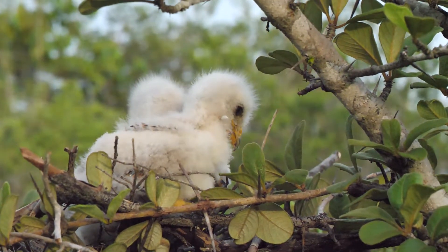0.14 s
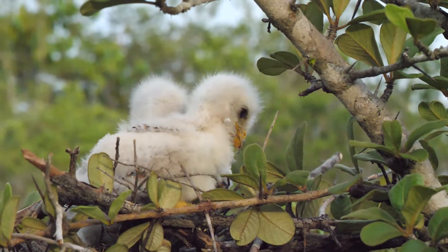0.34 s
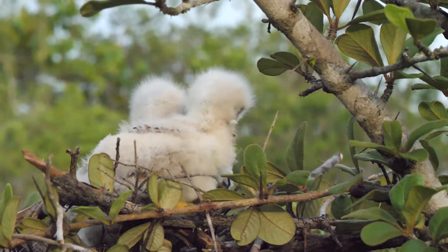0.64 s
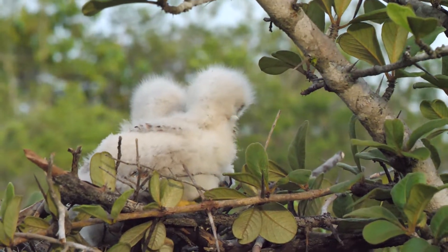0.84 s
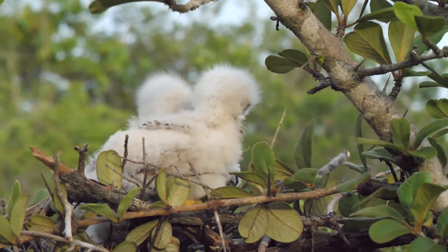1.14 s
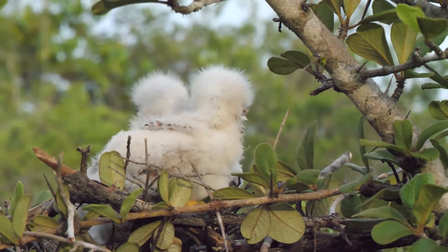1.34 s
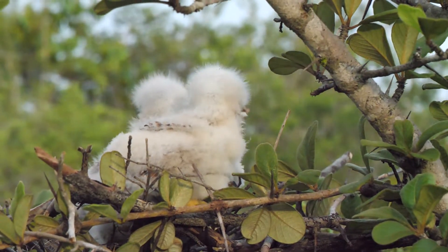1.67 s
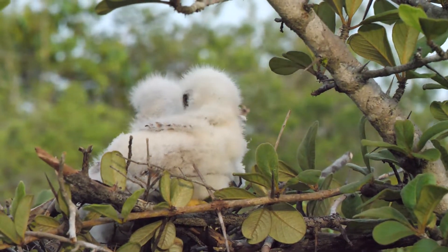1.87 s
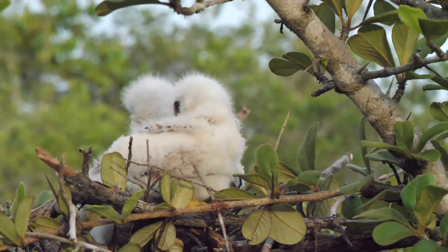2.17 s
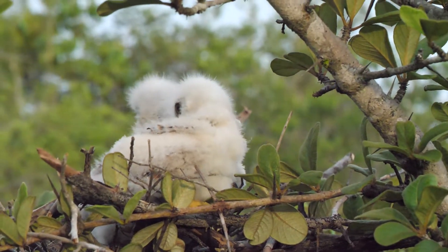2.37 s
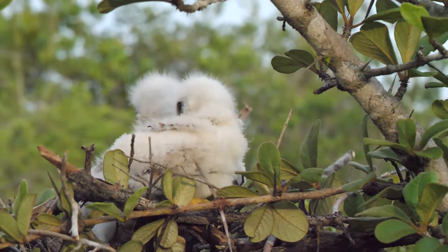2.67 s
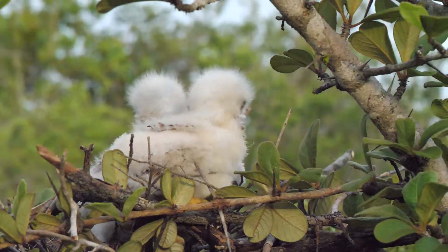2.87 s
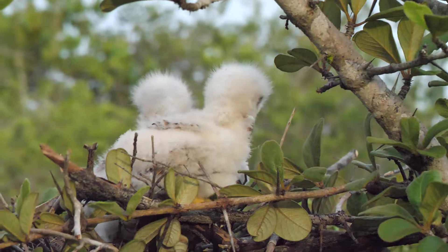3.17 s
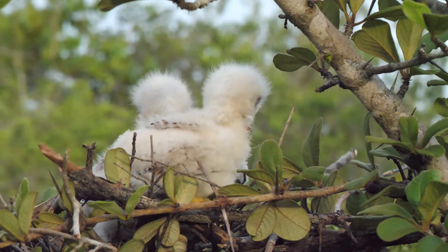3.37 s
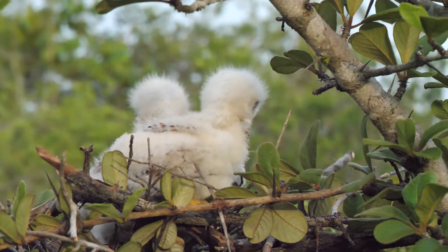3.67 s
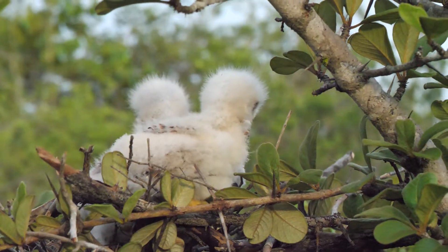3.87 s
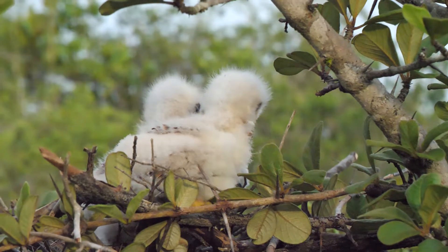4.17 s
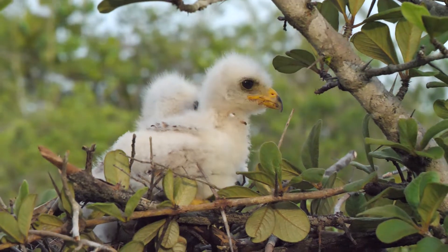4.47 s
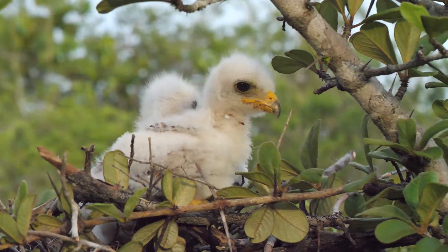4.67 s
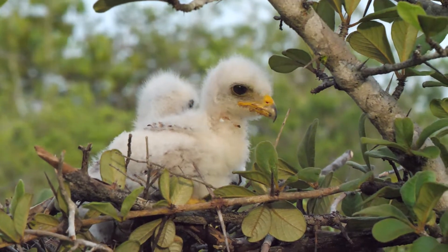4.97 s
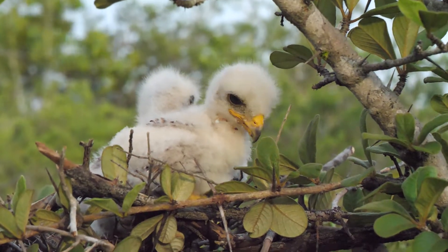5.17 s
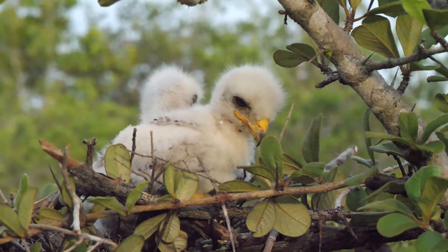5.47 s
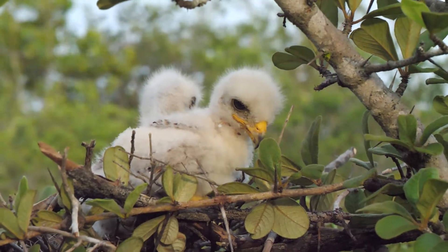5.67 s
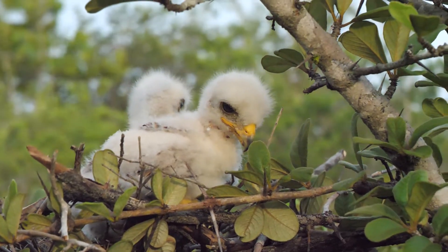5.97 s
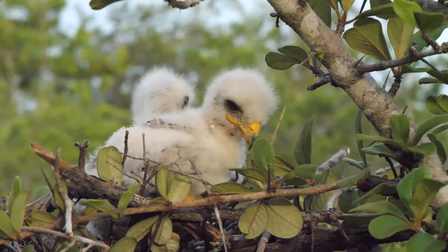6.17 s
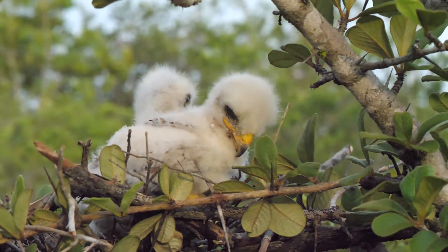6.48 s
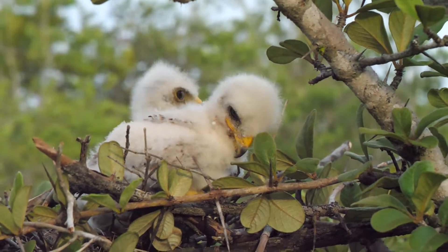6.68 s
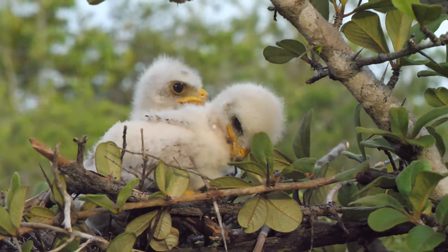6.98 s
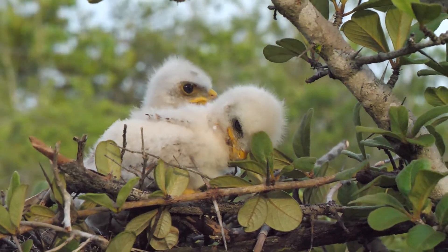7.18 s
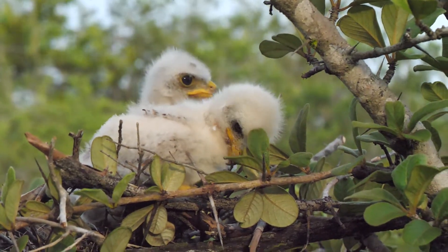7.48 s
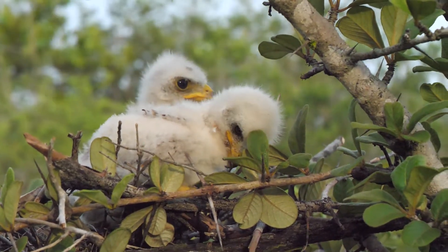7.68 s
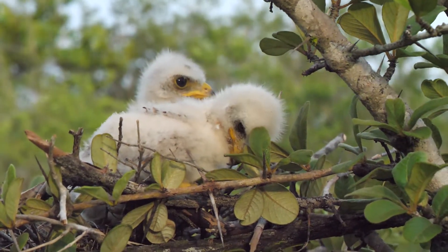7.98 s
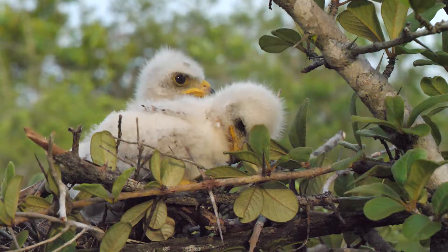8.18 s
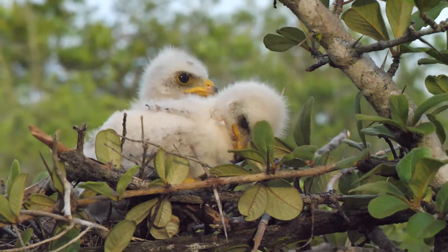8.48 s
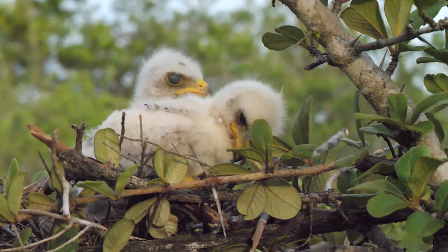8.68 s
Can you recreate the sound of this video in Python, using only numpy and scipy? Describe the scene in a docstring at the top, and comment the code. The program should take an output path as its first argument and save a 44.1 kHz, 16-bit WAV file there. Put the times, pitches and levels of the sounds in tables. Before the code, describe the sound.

Raptor chicks call close to a stereo microphone in a leafy tree nest. From 0 to 0.9 seconds a dense, shrill twitter runs at about twenty peeps a second, each whistle swooping down and up, deeper ones rasping, ending in a low squawk. A shorter run follows at 1.2-1.5, then faint squeaks and a few weak peeps near 2.2. Another burst comes at 2.6-2.9. From 3.4 to 4.5 the longest, loudest run swells and ends in a rough squawk; a further burst fills 4.7-5.05. Small squeaks follow, with soft dull bumps at 5.5-6.0 as low wind rises. A quieter, hoarser run at 6.1-6.6 ends in squawks, with three peeps near 7. Afterwards only sparse squeaks, weak peeps at 8.4 and a bump near 8.5 remain. Faint far whistles around 2.6-3.4, occasional buzzy distant chirps, a barely audible hum near 1.5-2.1 and airy hiss lie behind.

```python
"""Rapid, whistled twitters burst out close by: raptor nestlings calling in a stick nest in a tree.
Each peep is a whistle that swoops down and up again, some twenty a second; deep swoops break into a rasp.
Dives fall almost without rising, and bursts often end in a squawk about two octaves lower.
Shaped noise makes the rasp, the echoes from sticks and leaves, a few soft bumps, low wind and airy hiss.
Far birds add arched whistles, buzzy chirps and one faint hum."""
import sys
import numpy as np
from scipy import signal
from scipy.fft import rfft
from scipy.io import wavfile

SR = 44100
rng = np.random.default_rng(int(sys.argv[2]) if len(sys.argv) > 2 else 0)


def dump(signal):
    """Clip the signal to [-1, 1] and save it as 16-bit WAV at the path in sys.argv[1]."""
    limited = np.clip(np.atleast_2d(signal).T, -1, 1)
    pcm = np.round(limited * 32767).astype(np.int16)
    wavfile.write(sys.argv[1], SR, pcm)


N = 388962  # length of the scene in samples
TOP_HZ = 15750  # nothing is voiced or recorded above this

# The whistled peeps, burst by burst.
# Each row: start in seconds, nominal length in ms, pitch at the dip in Hz, level in dB before shared trims.
PEEPS = [(0, 12.7, 4730, -24), (.046, 13, 4930, -26), (0.085, 18.4, 4850, -26), (.128, 27, 4190, -26),
         (.175, 17, 5030, -25.5), (.216, 23.5, 4790, -25.5), (.268, 21.5, 4730, -27),
         (0.318, 9.5, 5220, -25.5), (.359, 19, 4900, -25), (.402, 20.5, 4880, -26), (.446, 21.3, 4790, -26),
         (.49, 25.7, 4230, -27.5), (.54, 16.4, 5410, -26.5), (.569, 32, 4570, -24.5),
         (.624, 21.6, 5420, -24.5), (.655, 36, 4540, -23), (.711, 25, 4590, -24), (.75, 31, 4460, -27.5),
         (.798, 24.3, 4980, -29.5), (.845, 21, 5490, -31.5), (0.888, 30, 3730, -30),
         (1.182, 14.4, 4310, -33), (1.201, 21.4, 5340, -26.5), (1.256, 12, 5570, -37.5),
         (1.29, 25, 4400, -25.5), (1.345, 12, 5520, -32), (1.385, 20.4, 4740, -25.5),
         (1.434, 21.3, 4740, -27), (1.488, 21.3, 4590, -27), (2.126, 20.5, 3650, -31.5),
         (2.179, 8.6, 3760, -41), (2.224, 18, 3730, -33), (2.601, 23.5, 3940, -26),
         (2.656, 12.2, 4170, -29.5), (2.702, 12, 4610, -23.5), (2.746, 11.6, 4440, -24),
         (2.788, 22.3, 3840, -29.5), (2.839, 11.5, 4590, -24.5), (2.862, 16, 4320, -28.5),
         (2.914, 33, 3130, -35), (3.39, 23.3, 3810, -27.5), (3.448, 9.3, 5480, -35),
         (3.489, 16.3, 4645, -23.5), (3.536, 13, 5000, -24.5), (3.576, 22.6, 4710, -23),
         (3.628, 11.4, 5590, -28), (3.671, 15.7, 5400, -26), (3.712, 18.4, 5470, -23.5),
         (3.748, 34, 4570, -24), (3.804, 16.8, 5270, -21), (3.842, 29, 4430, -22.5),
         (3.894, 19.2, 5320, -21), (3.94, 19.2, 5110, -20), (3.985, 18.4, 5100, -20.5),
         (4.031, 24, 4510, -23), (4.084, 18.6, 5010, -21), (4.129, 19.5, 5130, -22),
         (4.175, 19.7, 5080, -22), (4.222, 19, 5140, -21), (4.265, 21.3, 5340, -24),
         (4.31, 19.4, 5290, -22.5), (4.348, 37.5, 3790, -26), (4.411, 22, 4780, -22.5),
         (4.664, 9.7, 4030, -28.5), (4.677, 30.2, 4650, -22), (4.743, 17.4, 4680, -23),
         (4.787, 17.6, 4840, -23), (4.822, 27.4, 4970, -26), (4.858, 40.7, 4180, -26),
         (4.917, 21.7, 4670, -24), (4.965, 34.7, 3870, -26.5), (6.122, 22.6, 3310, -36.5),
         (6.171, 32, 2930, -33), (6.228, 13, 4590, -26), (6.267, 24, 4060, -28.5),
         (6.317, 25.5, 4080, -29.5), (6.367, 19.7, 4470, -28.5), (6.415, 20.4, 4700, -29),
         (6.46, 25, 4040, -29.5), (6.507, 25, 4130, -27.5), (6.551, 33, 3660, -29.5),
         (7.015, 14.6, 4220, -30), (7.057, 18, 4210, -32), (7.097, 17.7, 4790, -25.5),
         (8.388, 20.7, 3540, -33), (8.483, 11.7, 4590, -37)]
# Dives, peeps that fall almost without rising, often straight into a squawk.
# Each row: start in seconds, nominal length in ms, pitch at the bottom in Hz, level in dB before shared trims.
DIVES = [(.934, 17, 4510, -31), (1.552, 13, 3250, -52.5), (2.953, 20.6, 3290, -38),
         (4.458, 10.3, 4690, -26), (5.026, 14, 4020, -33), (6.598, 10, 4580, -31)]
# Spectrum of the rasp. Each row: frequency in Hz, relative level in dB.
RASP = [(700, -11.5), (1500, -17), (3000, -11), (4200, -7.5), (5200, 5), (6500, 4.5), (8000, -8),
        (9200, -18), (10500, -6), (12500, -17), (15500, -30)]
# Spectrum of the sizzle along with the whistle. Each row: frequency in Hz, relative level in dB.
SIZZLE = [(4000, -24), (6500, 8.5), (7800, 5.5), (9200, -3), (10500, -2), (12500, -12.5), (15500, -11)]
# Coarser rasp of slack membranes, in deep dips and squawks. Each row: frequency in Hz, relative level in dB.
GROWL = [(450, -17), (900, -1), (1400, 0.5), (2500, -8), (3300, 2.5), (5000, -14), (7000, 3.5),
         (9200, -14.5), (11000, -20), (15500, -25)]
LEVEL_DB = 0.46  # trim of all peeps and dives
# the longer a peep, the longer and so the deeper it falls before it turns
FALL_SHARE, FALL_DELAY_S = 0.66, 0.00455
# a dip at MIDDLE_HZ climbs back towards END_HZ; a higher dip or a rough note aims higher
MIDDLE_HZ, END_HZ, END_FOLLOW, RECOIL_HZ = 4775, 5850, 0.524, 1880
FULL_CLIMB_S = 0.005  # a shorter rise stops before the pitch is back
# the whistle breaks when it falls further than BREAK_HZ; rasp runs 0-1, before the hoarseness is applied
BREAK_HZ, BREAK_WIDTH_HZ, SHALLOW_RASP, DEEP_RASP = 1770, 250, 0.24, 0.814
# the rise is weaker than the fall, and more so in a rough note
RISE_DB, BROKEN_RISE_DB = -2.5, -10.5
LOW_RISE_DB_PER_HZ = 0.0008  # but from a low dip it climbs into the throat's resonance and gains


def peeps(bend=1.6, jitter=0.0019, rasp_jitter=0.075, shimmer_db=0.8, rasp_shimmer_db=3, slope_db=-10,
          attack=0.0045, release=0.0068, early_rasp=0.33, turn=0.011, easy_hz=5700,
          sizzle_db=-20, growl_db=1, size=2048):
    """Tension drops and returns in each peep; long ones fall deep and break up from the dip onward."""
    out, t = np.zeros(N), np.arange(size) / SR
    calls = [(row, False) for row in PEEPS] + [(row, True) for row in DIVES]
    for (s, ms, dip_hz, db), dives in calls:
        lift_db, hoarse, fall_speed = manner(s)
        length = ms / 1000
        fall = length if dives else FALL_SHARE * (length - FALL_DELAY_S)
        # at least a tenth of the note is left for the fall and for the rise
        fall = np.clip(fall, length / 10, length - length / 10)
        rise = length - fall
        depth_hz = fall_speed * fall
        breaking = 0.5 + 0.5 * np.tanh((depth_hz - BREAK_HZ) / BREAK_WIDTH_HZ)
        rough = hoarse * (SHALLOW_RASP + (DEEP_RASP - SHALLOW_RASP) * breaking)

        # pitch curve: down to the dip and up again
        start_hz = dip_hz + depth_hz
        end_hz = END_HZ + END_FOLLOW * (dip_hz - MIDDLE_HZ) + RECOIL_HZ * rough
        climb_hz = (end_hz - dip_hz) * min(rise / FULL_CLIMB_S, 1) ** 2
        swoop = np.clip((t - fall) / np.where(t < fall, fall, rise), -1, 1)
        hz = dip_hz + np.where(t < fall, depth_hz, climb_hz) * np.abs(swoop) ** bend

        # a breaking whistle shakes in pitch and in strength
        late = 0.5 + 0.5 * np.tanh((t - fall) / turn)
        broken = np.clip(rough * (early_rasp + (1 - early_rasp) * late), 0, 1)
        hz = hz * (1 + (jitter + rasp_jitter * broken) * wander(size, 780))
        shimmer = undb((shimmer_db + rasp_shimmer_db * broken) * wander(size, 550))
        # tightly stretched membranes take longer to start
        gate = swell(t, length + release / 2, attack * (start_hz / easy_hz) ** 2.0, release)
        tone = voice(hz, slope_db, count=3) * gate * shimmer

        # even out the two halves, then let the force ease after the dip
        falling = np.std(tone[t < fall])
        rising = np.std(tone[(t >= fall) & (t < length)])
        tone = tone / (falling ** (1 - late) * rising ** late)
        low_gain_db = LOW_RISE_DB_PER_HZ * max(MIDDLE_HZ - dip_hz, 0)
        ease_db = RISE_DB + BROKEN_RISE_DB * rough + low_gain_db
        force = undb(LEVEL_DB + db + ease_db * late)

        note = np.sqrt(1 - broken ** 2) * tone + broken * gate * rasp(size, RASP)
        note += undb(sizzle_db) * gate * shimmer * rasp(size, SIZZLE)
        # just after a rough dip the coarse low register is touched
        touch = np.exp(-((t - fall - 0.002) / 0.0026) ** 2)
        note += undb(growl_db) * broken ** 2 * touch * rasp(size, GROWL)
        add(out, s, beak(force * note, lift_db))
    return out


# The chicks' manner of calling as time passes.
# Each row: time in seconds, treble lift from the open beak in dB before BEAK shares it out,
# hoarseness (a factor on the rasp), average speed of the fall in Hz per second.
MANNER = [(0, 6, .7, 135000), (.48, 9.5, 0.9, 130000), (.63, -1, 0.75, 114800), (.8, 5.5, 1.05, 144500),
          (1.5, 4.5, 0.65, 100600), (2.15, -6, 0.54, 40000), (2.7, 0, 0.43, 114000),
          (3.45, 3, 0.13, 140700), (3.8, 3.5, 0.67, 159600), (4.4, 0.5, 0.87, 144700),
          (4.7, 0, 0.36, 100500), (5, 1, 0.84, 119800), (6.13, -6.5, .8, 89000), (6.2, -2.5, 0.85, 149500),
          (6.45, 5.5, 1.05, 134700), (7.05, -0.5, 1, 80000), (8.4, -4, 0.77, 65000)]


def manner(s):
    """Beak opening, hoarseness and speed of the fall at time s, gliding between the rows."""
    times, *columns = np.transpose(MANNER)
    return [np.interp(s, times, column) for column in columns]


# How much of the beak's lift each frequency gets. Each row: frequency in Hz, share (1 is the whole lift).
BEAK = [(6500, 0), (9500, 1.2), (15500, 1.46)]


def beak(x, lift_db):
    """A wider beak lets more of the overtones and spray out."""
    return np.fft.irfft(rfft(x) * undb(lift_db * at(BEAK, bins(x))), len(x))


# Squawks and soft squeaks in the low registers.
# Each row: start in seconds, nominal length in ms, starting pitch in Hz, level in dB before the fades.
SQUAWKS = [(0.272, 13, 1574, -48.5), (.419, 12, 1294, -48), (.713, 13, 2600, -45), (.868, 12, 1250, -50.5),
           (.945, 16, 2600, -30.5), (0.955, 19.4, 1288, -30), (.957, 13.3, 1680, -36), (1.7, 12, 1360, -54),
           (1.772, 10, 1380, -54), (1.903, 21, 2600, -49), (2.037, 15, 2450, -50), (2.27, 22, 2700, -47.5),
           (2.288, 12, 1010, -42.5), (2.923, 10.5, 1740, -50), (4.465, 25.4, 1313, -29.5),
           (4.977, 10.6, 1380, -44), (5.039, 16, 2460, -40), (5.048, 20.5, 1244, -32),
           (5.183, 7.8, 1370, -45.5), (5.429, 21.4, 2810, -43), (5.454, 9.6, 1520, -44),
           (6.605, 10.8, 1284, -30), (6.613, 16.6, 2453, -35.5), (6.653, 15, 1307, -45),
           (6.794, 13, 1176, -47.5), (6.927, 12.3, 1326, -45.5), (7.072, 10, 1240, -45),
           (7.167, 15.4, 1095, -42.5), (8.118, 14.4, 1360, -43.5), (8.391, 8.8, 1350, -46.5),
           (8.526, 14.5, 2870, -47), (8.653, 21, 2960, -42.5), (8.801, 23, 1380, -43)]
# each squawk sags by a share of its pitch, more with each octave above the low register
SQUAWK_SAG, LOW_REGISTER_HZ, SAG_PER_OCTAVE = 0.082, 1290, 0.046
# rasp 0-1 of a squawk at loud_db, and its change with each dB of level
SQUAWK_RASP, RASP_PER_DB = 0.64, 0.15


def squawks(slope_db=-8.5, effort_tilt=0.39, loud_db=-25, jitter=0.064, attack=0.0053, release=0.0025,
            size=2048):
    """Slack membranes beat slowly and sag in pitch; harder calls are brighter and rougher."""
    out, t = np.zeros(N), np.arange(size) / SR
    for s, ms, start_hz, db in SQUAWKS:
        length = ms / 1000
        octaves = np.log2(start_hz / LOW_REGISTER_HZ)
        sag = SQUAWK_SAG + SAG_PER_OCTAVE * octaves
        hz = start_hz * (1 - sag * np.minimum(t / length, 1) ** 2.35)
        # the higher register has weaker overtones
        slope = slope_db + effort_tilt * (db - loud_db) - 0.86 * octaves
        rough = np.clip(SQUAWK_RASP + RASP_PER_DB * (db - loud_db), 0, 1)
        shaky_hz = hz * (1 + jitter * rough * wander(size, 680))
        tone = unit(voice(shaky_hz, slope, count=10))
        note = np.sqrt(1 - rough ** 2) * tone + rough * rasp(size, GROWL)
        add(out, s, undb(db) * swell(t, length + release / 2, attack, release) * note)
    return out


# Peaks and notches that colour every call as its pitch glides. Each row: frequency in Hz, gain in dB.
VOICE_PEAKS = [(800, -26), (1300, -21), (2450, -9), (3200, -12), (3900, -5.5), (4300, -6), (4750, 5),
               (5200, 4.5), (5600, 0.5), (6400, -5), (7200, -11), (7950, -0.5), (9100, -20.5), (9750, -5.5),
               (12000, -14), (15500, -21)]


def voice(hz, slope_db, count):
    """Harmonics of the syrinx, falling by slope_db an octave, each weighted by the peaks and notches as it
    glides."""
    phase = 2 * np.pi * np.cumsum(hz) / SR
    total = 0
    for k in range(1, count + 1):
        strength = undb(slope_db * np.log2(k) + at(VOICE_PEAKS, k * hz)) * (k * hz < TOP_HZ)
        total = total + strength * np.cos(k * phase)
    return total


def rasp(size, spectrum, flutter_hz=1100, scatter=0.2975):
    """The membranes flap irregularly and chop the air into puffs."""
    phase = np.cumsum(flutter_hz * (1 + scatter * wander(size, flutter_hz / 2))) / SR
    puffs = np.sin(np.pi * phase) ** 4
    return colour(rng.standard_normal(size) * puffs, spectrum)


# How the two microphone ports hear a head held high.
# Each row: frequency in Hz, left minus right level in dB, lead of the left in radians.
PORTS = [(990, -5, 1.66), (1880, 12, 0.8), (2720, -2, 1.1), (3750, 5, 1.73), (4960, 8, 1.89),
         (5406, 1.5, 2.23), (5900, 13, 3.9), (7160, 1.5, 4.42), (9600, 6, 5.25), (10700, 7, 4.2),
         (13500, 1, 7.8)]
# The same for a head lowered among the leaves.
# Each row: frequency in Hz, left minus right level in dB, lead of the left in radians.
PORTS_LOW = [(1000, 3, 0), (3080, -0.5, -0.7), (4480, 5, 2.5), (4660, 17, 0.1), (5180, -3, -2),
             (5870, 7, -1.6), (7200, 1, -2.5), (9400, 2, 1.4), (10560, 6, -2.34), (13000, 4, -0.67)]
HEAD_DOWN_S = 5.7  # the head is lowered from here on


def ports(x, hearing):
    """The microphone body makes the two ports differ in level and phase, keeping their mean power."""
    half = undb(at(hearing, bins(x)) / 2) * np.exp(0.5j * at(hearing, bins(x), axis=2))
    power = np.sqrt((np.abs(half) ** 2 + np.abs(half) ** -2) / 2)
    return np.fft.irfft(rfft(x) * np.array([half, 1 / half]) / power, N)


def scatter(x, t60, db, size=22050):
    """A dense echo from sticks and leaves, fading 60 dB in t60 seconds, different at each port."""
    t = np.arange(size) / SR
    fade = np.exp(-np.log(1000) * t / t60)
    echo = rng.standard_normal((2, size)) * fade * (t > 0.002)
    echo *= undb(db) / np.sqrt(np.sum(echo ** 2, axis=1, keepdims=True))
    return signal.fftconvolve(x[None], echo, axes=1)[:, :N]


# Soft low bumps. Each row: start in seconds, peak level in dB.
BUMPS = [(5.543, -37), (5.615, -41.5), (5.828, -34), (5.877, -38.5), (5.935, -35.5), (5.968, -38.5),
         (6.326, -44), (8.446, -48), (8.523, -37.5)]
# Spectrum of a bump. Each row: frequency in Hz, relative level in dB.
THUD = [(40, -46), (80, -38), (130, 5.5), (200, 2), (330, -5.5), (450, -17.5), (900, -65)]


def bumps(length=0.026, attack=0.0064, size=4096):
    """Dull knocks of a few uneven cycles, cut from low noise."""
    out, t = np.zeros(N), np.arange(size) / SR
    for s, db in BUMPS:
        knock = colour(rng.standard_normal(size), THUD) * swell(t, length, attack, length)
        add(out, s, undb(db) * knock / np.max(np.abs(knock)))
    return out


# A far bird's phrase of soft whistles.
# Each row: start in seconds, length in seconds, level in dB before the echo joins.
FAR_WHISTLES = [(2.55, .1, -60), (2.729, .12, -57.5), (2.935, .17, -60), (3.203, 0.17, -61)]
WHISTLE_HZ, WHISTLE_STEP_HZ = 1526, 64.8  # top of the first whistle, and the step up to each next
# A far bird's buzzy chirps. Each row: start in seconds, level in dB before the echo joins.
FAR_CHIRPS = [(1.668, -58.5), (3.18, -60), (7.196, -55), (7.75, -57), (8.47, -54.5)]
CHIRP_HZ, CHIRP_S = 3710, 0.105
HUM_AT_S, HUM_S, HUM_HZ, HUM_DB = 1.5, 0.64, 395, -60.5  # a faint far hum


def far_birds():
    """Arched whistles and buzzy chirps from other trees, and one faint low hum, with their echo."""
    out = np.zeros(N)
    for k, (s, length, db) in enumerate(FAR_WHISTLES):
        top_hz = WHISTLE_HZ + k * WHISTLE_STEP_HZ
        add(out, s, undb(db) * far_note(length, top_hz, arch=0.142, scatter_hz=35))
    for s, db in FAR_CHIRPS:
        add(out, s, undb(db) * far_note(CHIRP_S, CHIRP_HZ, arch=0.16, scatter_hz=477))
    add(out, HUM_AT_S, undb(HUM_DB) * far_note(HUM_S, HUM_HZ, arch=0.0297, scatter_hz=17))
    return out + scatter(out, t60=0.18, db=-3)


def far_note(length, top_hz, arch, scatter_hz, size=32768):
    """A note that swells and arches in pitch; scatter makes it buzz."""
    t = np.arange(size) / SR
    arched_hz = top_hz * (1 - arch * (2 * np.minimum(t / length, 1) - 1) ** 2)
    hz = arched_hz + scatter_hz * wander(size, 500)
    return swell(t, length, length / 2, length / 2) * np.sin(2 * np.pi * np.cumsum(hz) / SR)


# The wind's strength. Each row: time in seconds, rumble level in dB.
WIND = [(0, -59.5), (2.8, -58), (4.4, -56), (4.9, -57), (5.45, -54), (5.6, -48), (6.1, -52.5), (6.7, -56.5),
        (7.2, -53), (7.6, -54.5), (7.78, -51), (8, -50), (8.2, -57)]
# Spectrum of the wind rumble. Each row: frequency in Hz, relative level in dB per Hz.
RUMBLE = [(20, -41), (45, -27), (70, -13.5), (110, -1.5), (180, 1), (240, -3), (330, -16), (600, -31),
          (1500, -59)]
# Spectrum of the open-air hiss. Each row: frequency in Hz, relative level in dB per Hz.
AIR = [(60, -37), (300, -0.5), (450, -1), (780, 0), (1200, -5), (2100, -9.5), (3000, -7.5), (4500, -15.5),
       (6700, -17.5), (7700, -12), (9200, -35), (10600, -22.5), (11500, -20.5), (15500, -17.5)]
# How alike the hiss is at the two ports. Each row: frequency in Hz, correlation (1 is identical).
AIR_LIKENESS = [(300, 0.98), (700, 0.89), (1400, 0.6), (3000, 0.81), (7000, 0.17), (14000, 0)]
AIR_DB = -53  # middle level of the hiss, around which it flickers


def outdoors(rumble_side_db=-21, flicker_db=1.0):
    """Low wind, nearly alike at both ports, under a wider hiss of far foliage."""
    sides = np.array([[1], [-1]])
    mid, side = (colour(rng.standard_normal(N), RUMBLE) for _ in range(2))
    wind_db = np.interp(np.arange(N) / SR, *np.transpose(WIND))
    rumble = (mid + undb(rumble_side_db) * side * sides) * undb(wind_db)
    # the hiss is mixed from a shared and an opposed part at each frequency
    mid, side = (rfft(colour(rng.standard_normal(N), AIR)) for _ in range(2))
    alike = np.clip(at(AIR_LIKENESS, bins(rumble[0])), 0, 1)
    shared = mid * np.sqrt((1 + alike) / 2)
    opposed = sides * side * np.sqrt((1 - alike) / 2)
    hiss = np.fft.irfft(shared + opposed, N)
    return rumble + hiss * undb(AIR_DB + flicker_db * wander(N, 2.9))


def undb(db):
    """Decibels to gain."""
    return 10 ** (np.asarray(db) / 20)


def unit(x):
    """Scale to rms 1."""
    return x / np.sqrt(np.mean(x ** 2) + 1e-18)


def at(points, hz, axis=1):
    """Read a column of a frequency table on a log axis."""
    table = np.array(points, float)
    return np.interp(np.log(np.maximum(hz, 1)), np.log(table[:, 0]), table[:, axis])


def bins(x):
    """Frequencies of the spectrum of x."""
    return np.fft.rfftfreq(len(x), 1 / SR)


def colour(x, points):
    """Filter x by a curve of (Hz, dB) points, then scale to rms 1."""
    return unit(np.fft.irfft(rfft(x) * undb(at(points, bins(x))), len(x)))


def wander(size, hz):
    """Smooth chance up to about hz, spread 1."""
    x = rng.standard_normal(size)
    return unit(np.fft.irfft(rfft(x) / (1 + (bins(x) / hz) ** 4), size))


def swell(t, length, attack, release):
    """Rounded rise and fall of a note."""
    rising = np.sin(np.pi / 2 * np.clip(t / attack, 0, 1))
    falling = np.sin(np.pi / 2 * np.clip((length - t) / release, 0, 1))
    return rising * falling


def add(track, s, x):
    """Mix x into the track at time s."""
    start = int(np.clip(s * SR, 0, N - 1))
    track[start:start + len(x)] += x[:N - start]


def scene():
    """The chicks, their echoes from the nest and the crown of the tree, and the land around."""
    chicks = peeps() + squawks()
    lowered = np.arange(N) / SR > HEAD_DOWN_S
    direct = ports(chicks * ~lowered, PORTS) + ports(chicks * lowered, PORTS_LOW)
    nest_echo = scatter(chicks, t60=0.049, db=-9.5)
    crown_echo = scatter(chicks, t60=0.43, db=-19.5)
    return direct + nest_echo + crown_echo + far_birds() + bumps() + outdoors()


def record(dry):
    """The recorder cuts the top with a steep low-pass filter."""
    low_pass = signal.ellip(10, 0.2, 70, TOP_HZ, fs=SR, output="sos")
    return signal.sosfilt(low_pass, dry)


dry = scene()
out = record(dry)
dump(out)
```